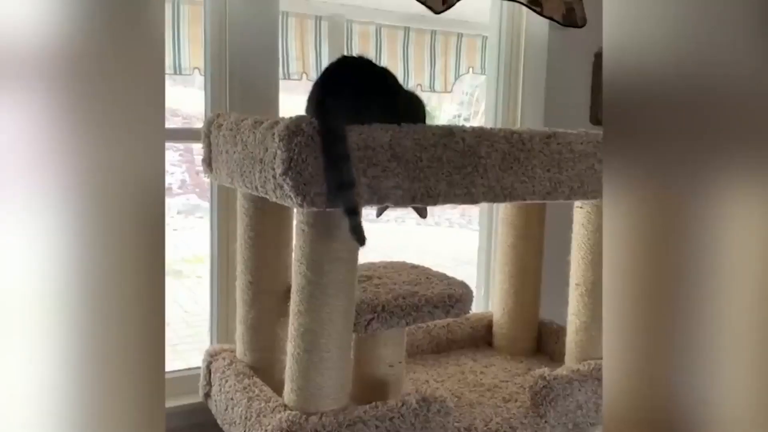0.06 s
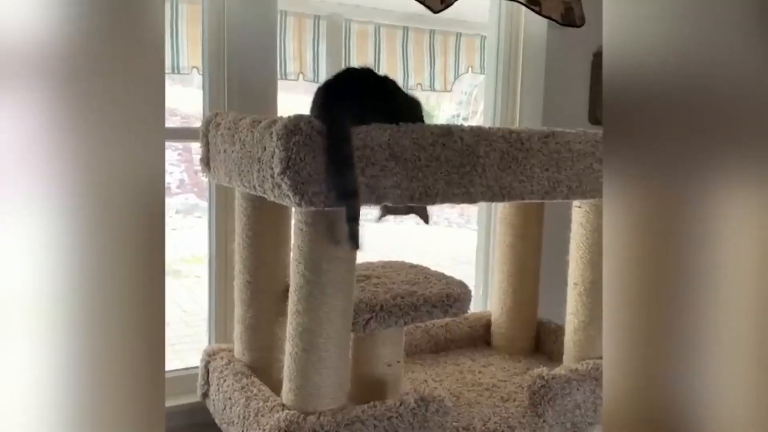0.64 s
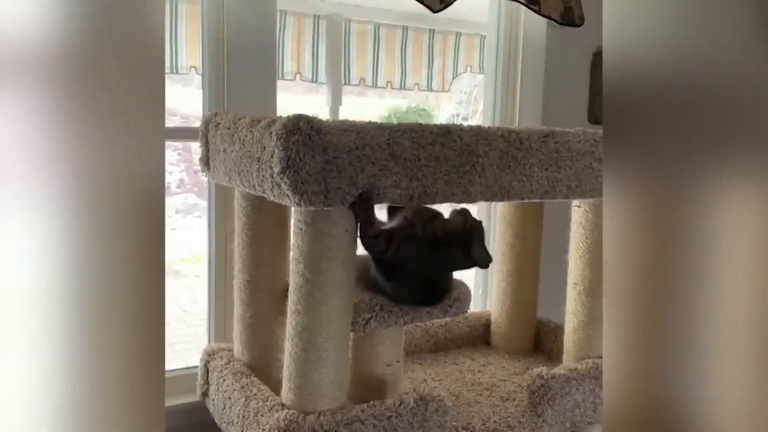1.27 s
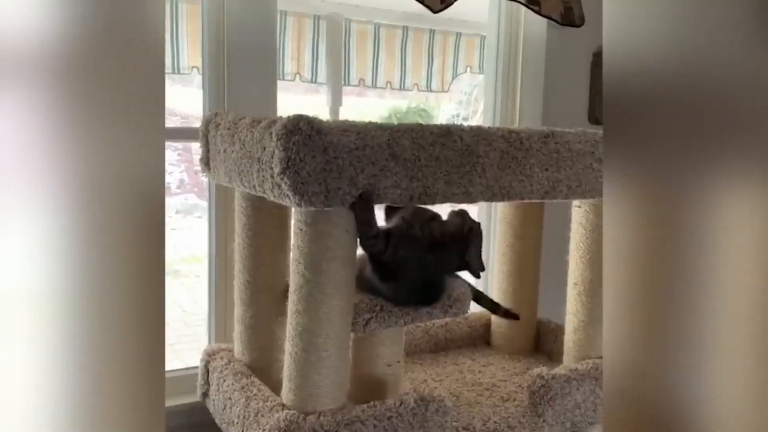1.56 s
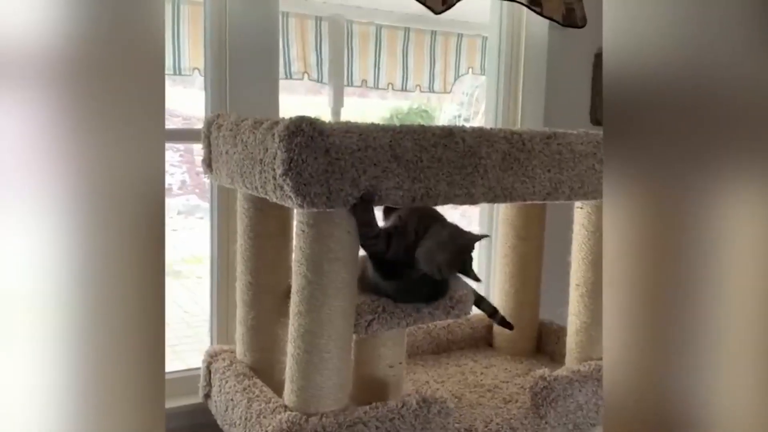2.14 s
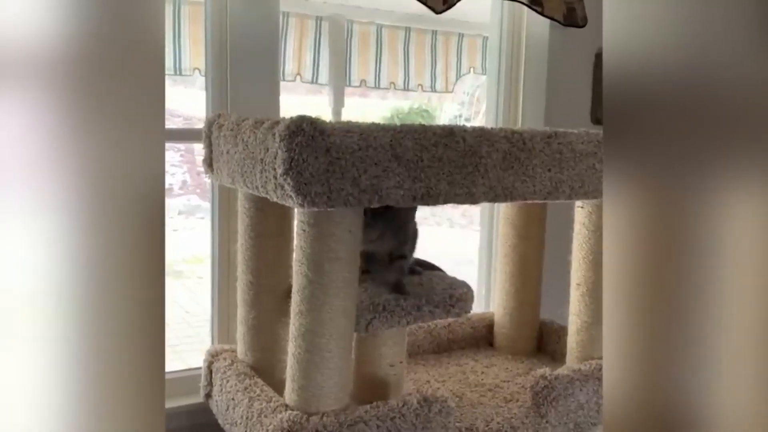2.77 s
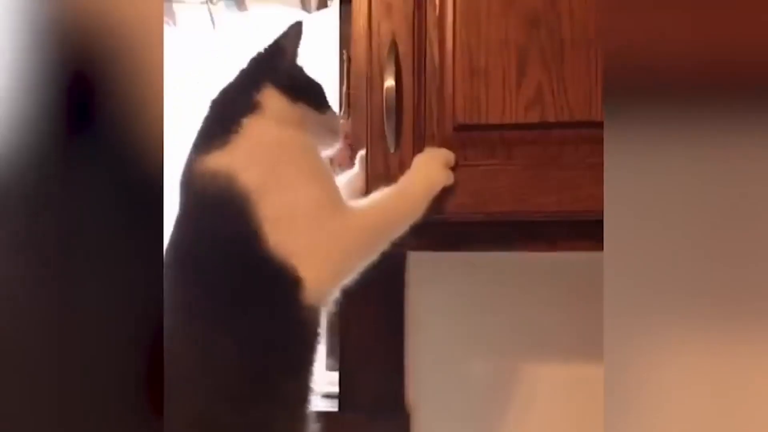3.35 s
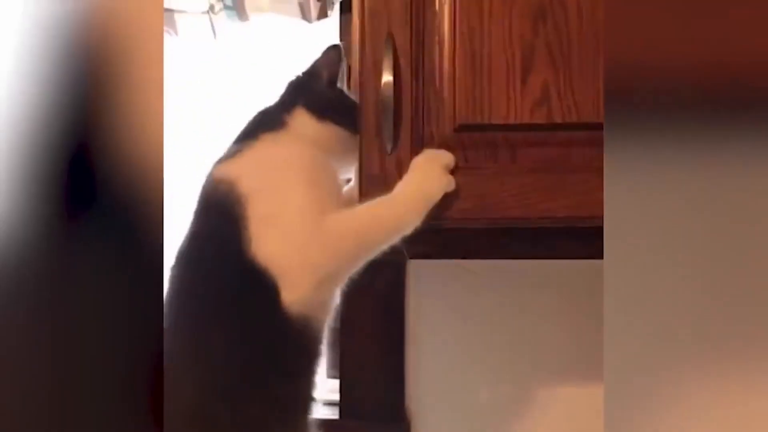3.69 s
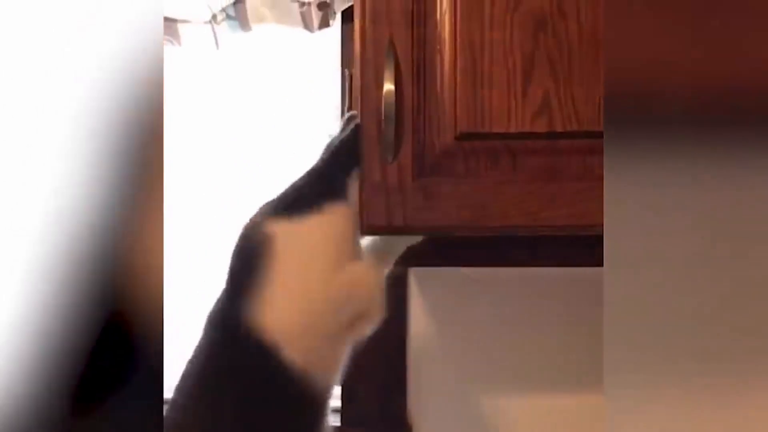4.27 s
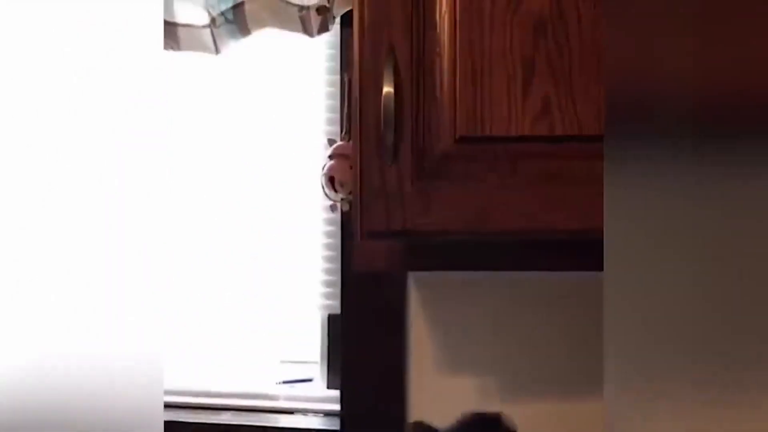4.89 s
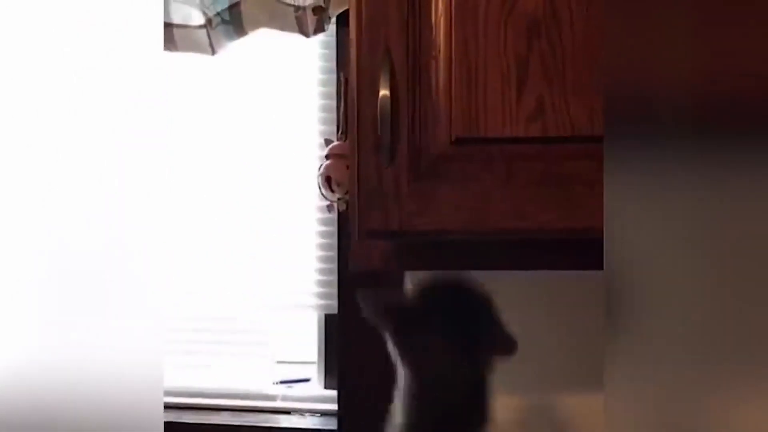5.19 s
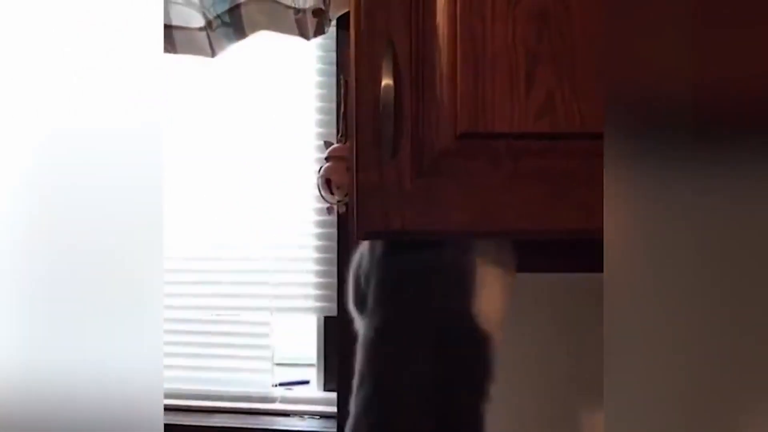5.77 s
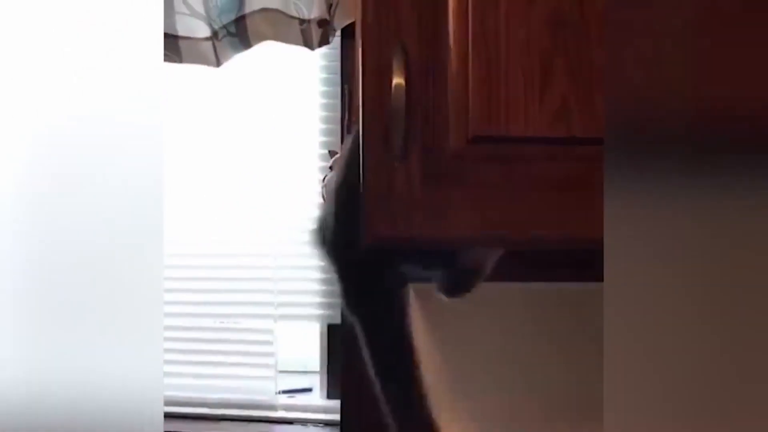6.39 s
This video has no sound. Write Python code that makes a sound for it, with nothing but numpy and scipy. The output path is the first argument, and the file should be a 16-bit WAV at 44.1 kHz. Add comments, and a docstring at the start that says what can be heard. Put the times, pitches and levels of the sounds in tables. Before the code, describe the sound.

A cat claws and thumps onto a carpeted cat tree, then paws a wooden cabinet door that bangs twice over a low hum.

```python
"""Claws snap out of the carpet of a cat tree in a quiet sunroom; then the cat thuds onto a shelf,
exciting the tower's modes and rocking it on its base. The scene changes to a kitchen with a mains hum,
where a cat scuffs and picks at a wooden cabinet door. Twice the door falls back on its frame,
and the impact sets its panel booming."""
import sys
import numpy as np
from scipy import signal
from scipy.fft import rfft, irfft, next_fast_len
from scipy.io import wavfile

SR = 44100
rng = np.random.default_rng(int(sys.argv[2]) if len(sys.argv) > 2 else 0)


def wav_out(sig):
    """Save sig, one row per channel (or a flat mono array), as 16-bit PCM at SR to the path in sys.argv[1]."""
    wavfile.write(sys.argv[1], SR, np.round(np.clip(np.atleast_2d(sig).T, -1, 1) * 32767).astype(np.int16))


N = 288414
TIME = np.arange(N) / SR
EVENT_TIME = TIME[:32768]  # seconds within one short sound

# Each row: start in seconds, ring level in dB, ring tilt in dB per octave, thud level in dB,
# thud cutoff in Hz.
LANDINGS = [(.822, -34, -1.5, -35, 280), (0.847, -39.5, -1.5, -36, 201), (1.043, -33, 2.5, -18, 450),
            (1.05, -12, .5, -17, 2780), (2.338, -41, -1, -35, 320), (2.468, -29, -4, -39, 420),
            (2.529, -55, -6, -60, 151)]
# Each row: mode frequency in Hz, level in dB, decay time (T60) in seconds.
TOWER_MODES = [(71.3, 2.5, .5), (82.4, -33, .3), (154.8, -3.5, 0.33), (233.5, -10, 0.26),
               (279.6, -17, 0.31), (391, -27, 0.42), (513, -29, 0.22), (573, -17.5, 0.21),
               (639, -7.5, 0.13), (664, -34, 0.26), (714, -29, 0.37), (764, -23.5, 0.22), (874, -15, 0.18),
               (922, -34.5, 0.36), (1030, -31, 0.24), (1133, -24, 0.25), (1480, -35, 0.17)]
# A body on carpeted wood. Each row: frequency in Hz, level in dB.
THUD_SPECTRUM = [(30, -13), (110, 0.5), (220, -0.5), (450, -7), (850, -7), (1150, -16.5), (1650, -20),
                 (2100, -34), (3300, -29.5), (4600, -44.5), (15000, -46)]
# Reverberation. Each row: frequency in Hz, T60 in seconds.
SUNROOM_T60 = [(100, 0.42), (400, 0.43), (1400, 0.36), (3000, 0.24), (7000, 0.21), (14000, 1)]
# Stereo spread of a contact. Each row: frequency in Hz, side minus mid in dB.
HIT_WIDTH = [(60, -31), (200, -17.5), (380, -10.5), (700, -1.5), (1300, -5.5), (4000, 2.5), (15000, -3.5)]
def landings():
    """Impact excitation: the cat's soft weight gives a dull thud and rings the tower's modes."""
    out = np.zeros((2, N))
    for s, ring_db, tilt_db, thud_db, cutoff_hz in LANDINGS:
        thud = burst(THUD_SPECTRUM, SUNROOM_T60, contact_s=.012, room_db=-6, rise_s=.0051,
                     width=HIT_WIDTH)
        tower = ring(TOWER_MODES, rise_s=.0047, tilt_db=tilt_db)
        add(out, s, amp(ring_db) * tower + amp(thud_db) * soften(thud, cutoff_hz))
    return out

# Each row: start in seconds, boom level in dB, boom tilt in dB per octave, clack level in dB,
# clack cutoff in Hz.
DOOR_KNOCKS = [(5.3797, -39, 3, -28.5, 2500), (5.385, -27, 1, -25, 5030), (5.3922, -16, 1, -21.5, 5560),
               (5.474, -52, 3.5, -37, 3480), (6.224, -26.5, -1.5, -36.5, 1490),
               (6.2314, -43.5, 6.5, -26.5, 4100), (6.2369, -16, -3, -26.5, 2510),
               (6.2433, -23, 2, -23.5, 4270), (6.283, -47, 6, -30.5, 4000), (6.317, -59, 1, -35, 3930)]
# Each row: mode frequency in Hz, level in dB, T60 in seconds.
DOOR_MODES = [(123.6, -24.5, 0.14), (142, -12.5, 0.8), (144.8, -1.5, 0.8), (182, -12, 0.5),
              (222.1, -13, 0.35), (292, -7.5, 0.37), (340.3, -8, 0.34), (468, -19.5, 0.34),
              (585, -31, 0.38), (769, -17, 0.14), (952, -28, 0.35), (1120, -24.5, 0.14),
              (1250, -31.5, 0.37), (1345, -35, 0.22), (1472, -31, 0.23), (1616, -29.5, 0.43),
              (1740, -33, 0.19), (1834, -30, 0.29), (1928, -33.5, 0.46), (2250, -42, 0.41),
              (2300, -37.5, 0.23), (2370, -36.5, 0.2), (2666, -27, 0.14), (2860, -39.5, 0.42),
              (2920, -32, 0.16), (2954, -35.5, 0.084), (3300, -37.5, 0.41), (5640, -53, .22)]
# Door against frame. Each row: frequency in Hz, level in dB.
CLACK_SPECTRUM = [(25, 0), (80, 2), (200, 17.5), (330, 6.5), (550, -4.5), (850, -1.5), (1500, -2),
                  (2000, -5), (2900, -1), (4000, -7), (5200, -17), (7000, -17.5), (9000, -18)]
# Reverberation. Each row: frequency in Hz, T60 in seconds.
KITCHEN_T60 = [(100, 0.25), (400, 0.6), (1500, 0.41), (3000, 0.37), (6000, 0.45), (9000, .28)]
def door_knocks():
    """Free vibration of a plate: the door chatters on its frame, and its panel booms after each blow."""
    out = np.zeros((2, N))
    for s, boom_db, tilt_db, clack_db, cutoff_hz in DOOR_KNOCKS:
        clack = burst(CLACK_SPECTRUM, KITCHEN_T60, contact_s=.0078, room_db=-9.5, rise_s=.0013)
        boom = ring(DOOR_MODES, rise_s=.00093, tilt_db=tilt_db)
        add(out, s, amp(boom_db) * boom + amp(clack_db) * soften(clack, cutoff_hz))
    return out

# Each row: start in seconds, then the levels of tick, snap, knock and shelf ring in dB.
CLAW_SNAPS = [(0.764, -61, -44, -39.5, -45), (.770, -50, -41.5, -37, -47), (0.805, -70, -52, -41.5, -41.5),
              (0.87, -66, -57, -52, -70), (0.891, -68, -57.5, -51, -72), (.968, -78, -65.5, -53, -54.5),
              (1.315, -82, -70, -64.5, -71.5), (1.652, -84, -75, -62, -72), (2.326, -62, -43, -39, -60),
              (2.456, -40, -39.5, -32, -48), (2.461, -58, -65, -53, -32), (2.61, -74, -61.5, -73, -76)]
# The carpet's snap and the board's knock. Each row: frequency in Hz, level in dB.
SNAP_SPECTRUM = [(500, -26.5), (2000, -8), (3500, 4), (4900, -15), (5700, 4.5), (6600, 8), (7600, -2.5),
                 (9000, -35), (10500, -11), (15500, -33)]
BOARD_SPECTRUM = [(40, -7), (180, -0.5), (350, -1), (520, -4), (680, -4), (1080, -10), (1400, -10),
                  (2000, -12), (3500, -19.5), (6000, -35), (15000, -55.5)]
# Each row: mode frequency in Hz, level in dB, T60 in seconds.
SHELF_MODES = [(354, -2, 0.23), (392, -8, 0.22), (643, -1.5, 0.14), (805, -11, 0.18), (900, -3, 0.099),
               (955, -8.5, 0.18), (1220, -1, 0.065), (1362, 4.5, 0.04), (1430, -18, 0.17),
               (1674, -20.5, 0.29), (2350, -16, 0.12)]
def claw_snaps(tick_s=.0015):
    """Sudden release of tension: a claw lets go of a fibre, and the board beneath knocks and rings."""
    out = np.zeros((2, N))
    shelf = ring(SHELF_MODES, rise_s=.001)
    for s, tick_db, snap_db, knock_db, ring_db in CLAW_SNAPS:
        snap = burst(SNAP_SPECTRUM, SUNROOM_T60, contact_s=.0029, room_db=-10, rise_s=.00019,
                     width=HIT_WIDTH)
        knock = burst(BOARD_SPECTRUM, SUNROOM_T60, contact_s=.01, room_db=-6.5, rise_s=.0053,
                      width=HIT_WIDTH)
        tick = np.diff(rng.standard_normal(len(EVENT_TIME) + 1)) * np.exp(-EVENT_TIME / tick_s)
        release = amp(tick_db) * tick + amp(snap_db) * snap
        add(out, s, release + amp(knock_db) * knock + amp(ring_db) * shelf)
    return out

# Each row: start in seconds, click level in dB, ring level in dB, ring tilt in dB per octave.
DOOR_PICKS = [(3.397, -50, -58, 5.5), (3.609, -32.5, -38, 4.5), (3.860, -63, -49, 5),
              (3.955, -41.5, -51, 4.5), (4.209, -49, -40.5, 2), (5.706, -50, -54.5, 5.5),
              (6.149, -40, -36.5, 0)]
# A claw on wood. Each row: frequency in Hz, level in dB.
CLICK_SPECTRUM = [(200, 9), (800, 0), (1600, 2), (3000, 3), (4500, -4.5), (6000, -7), (9000, -11.5)]
def door_picks():
    """A brief, hard contact is broadband: claws click on the door's edge and reach its upper modes."""
    out = np.zeros((2, N))
    for s, click_db, ring_db, tilt_db in DOOR_PICKS:
        click = burst(CLICK_SPECTRUM, KITCHEN_T60, contact_s=.0054, room_db=-9, rise_s=.00031)
        panel = ring(DOOR_MODES, rise_s=.0015, tilt_db=tilt_db)
        add(out, s, amp(ring_db) * panel + amp(click_db) * click)
    return out

# Each row: start in seconds, level in dB, pitch in Hz.
PAW_STEPS = [(4.911, -17.5, 77.4), (4.924, -15, 57.7), (4.97, -20, 66), (5.194, -19.5, 69)]
def paw_steps(t60_s=.048):
    """Strong damping: each padded step on the counter is a low tone that dies within a few cycles."""
    out = np.zeros((2, N))
    for s, db, hz in PAW_STEPS:
        add(out, s, ring([(hz, db, t60_s)], rise_s=.0021))
    return out

# Shifts of the cat's weight. Each row: start in seconds, level in dB, T60 in seconds.
SHOVES = [(.80, -35, 1.7), (1.06, -25, 1.37), (2.49, -31, 0.48), (2.74, -47, 3.1)]
# The tower's low sway. Each row: frequency in Hz, level in dB.
SWAY_SPECTRUM = [(12, -14.5), (27, -4.5), (36, -1), (55, -16), (75, -16.5), (130, -24.5), (400, -42),
                 (1500, -100)]
def rocking(rise_s=.04):
    """Incoherent addition: the sway builds and decays after each shove, and the shoves sum in power."""
    power = 0
    for s, db, t60 in SHOVES:
        age = np.maximum(TIME - s, 0)
        envelope = amp(db - 60 * age / t60) * (1 - np.exp(-age / rise_s))
        power = power + envelope ** 2
    return noise(SWAY_SPECTRUM, N) * np.sqrt(power)

# Each row: peak time, rise and fall in seconds, level in dB, tilt in dB per octave.
SCUFFS = [(3.30, 0.056, 0.19, -48.5, 7), (3.409, 0.049, .2, -52, -3.5), (3.581, 0.084, 0.35, -58, 4.5),
          (3.929, 0.073, 0.25, -45.5, -4.5), (4.21, .04, 0.041, -60, 1), (4.82, 0.16, 0.18, -55.5, -3),
          (5.71, 0.042, 0.079, -49, 0.5), (6.11, 0.12, 0.28, -51.5, 0.5), (6.179, 0.03, 0.093, -55.5, 4)]
# Fur and pads on wood. Each row: frequency in Hz, level in dB.
RUB_SPECTRUM = [(200, 7.5), (700, 5), (1500, 6.5), (3000, 1.5), (4300, -1.5), (5200, -10), (9000, -15.5)]
def scuffs(grain_db=.5, grain_samples=64, catch_db=1.76):
    """Stick-slip friction: many tiny slips of uneven size swell and fade under each stroke."""
    out = np.zeros((2, N))
    size = len(EVENT_TIME)
    from_peak = EVENT_TIME - EVENT_TIME[-1] / 2
    for s, rise, fall, db, tilt_db in SCUFFS:
        slips = rng.standard_normal(size)
        grain = np.repeat(rng.standard_normal(size), grain_samples)[:size]
        catch = unit(soften(rng.standard_normal(size), hz=45))  # the paw catches and lets go
        rub = colour(slips * amp(grain_db * grain + catch_db * catch), RUB_SPECTRUM, tilt_db)
        add(out, s + from_peak[0], amp(db) * stroke(from_peak, rise, fall) * rub)
    return out

# Each row: peak time in seconds, fur level in dB, board level in dB.
BRUSHES = [(0.746, -80, -60.5), (.88, -69.5, -60), (1.09, -70, -61), (2.29, -69.5, -71), (2.6, -78, -66.5)]
# Fur on carpet. Each row: frequency in Hz, level in dB.
FUR_SPECTRUM = [(600, -9.5), (2000, 3.5), (3500, -3), (6500, 3), (11000, -2), (15500, -2)]
# Stereo spread of fur and room air. Each row: frequency in Hz, side minus mid in dB.
AIR_WIDTH = [(60, -27.5), (200, -8.5), (380, -3.5), (700, 1.5), (15000, -0.5)]
def brushing():
    """Friction noise: fur hisses on the carpet as the body turns, and the board beneath murmurs."""
    fur, board = noise(FUR_SPECTRUM, N, AIR_WIDTH), noise(BOARD_SPECTRUM, N, HIT_WIDTH)
    return sum((amp(fur_db) * fur + amp(board_db) * board) * stroke(TIME - s, rise_s=.054, fall_s=.061)
               for s, fur_db, board_db in BRUSHES)

# Each row: frequency of a spectral line in Hz, relative level in dB.
HUM_LINES = [(49.9, -2), (99.8, -12.5), (120, -15), (143.5, -21), (236.5, -18), (287, -17)]
def mains_hum(level_db=-37.5, lowest_waver=.21, upper_waver=.8):
    """Amplitude and phase modulation: an appliance's hum wavers, most of all in its upper lines."""
    lines = []
    for k, (hz, db) in enumerate(HUM_LINES):
        wander = (upper_waver if k else lowest_waver) * (drift(3.8) + 1j * drift(5)) / 2
        carrier = np.exp(2j * np.pi * (hz * TIME + rng.random()))
        lines.append(amp(db) * unit(((1 + wander) * carrier).real))
    return amp(level_db) * (lines[0] * hum_swell() + sum(lines[1:]))

def hum_swell(start_s=4.32, length_s=.27, edge_s=.04, height_db=4):
    """A trapezoidal envelope: the level rises once, holds and falls back."""
    age = TIME - start_s
    return amp(height_db * np.clip(np.minimum(age, length_s - age) / edge_s, 0, 1))

# The kitchen's low rush and rumble. Each row: frequency in Hz, level in dB.
RUSH_SPECTRUM = [(76, -28.5), (130, -2.5), (192, -6), (235, -3), (289, 0), (400, -7.5), (509, -16),
                 (587, -7.5), (676, -17), (900, -18.5), (1150, -22), (2070, -31.5), (4050, -33.5),
                 (5000, -41.5), (9000, -49)]
RUMBLE_SPECTRUM = [(18, -18.5), (40, 7.5), (65, 4.5), (90, -10.5), (120, -6), (170, -3.5), (400, -50)]
# Each row: peak time in seconds, gain in dB.
RUSH_SWELLS = [(3.3, 2.5), (4.15, 2.5), (5.05, 3)]
def rush_and_rumble(rush_db=-45.5, rumble_db=-47):
    """Slow amplitude modulation: a low rushing noise swells gently three times over a steady rumble."""
    swell_db = sum(db * stroke(TIME - s, rise_s=.24, fall_s=.24) for s, db in RUSH_SWELLS)
    rush = amp(rush_db + swell_db) * noise(RUSH_SPECTRUM, N)
    return rush + amp(rumble_db) * noise(RUMBLE_SPECTRUM, N)

# Each row: centre frequency in Hz, bandwidth in Hz, gain in dB.
KITCHEN_RESONANCES = [(230.3, 6.3, 6), (723, 7.3, 6.5), (873, 26, 6.5), (1414, 37, 7.5), (1512, 42, 5.5),
                      (1767, 45, 5.5), (1978, 40, 4.5), (2150, 16, 8), (2270, 20, 3.5), (2680, 30, 0),
                      (3470, 44, -1), (5640, 83, 2), (6000, 460, 3), (7870, 88, 1)]
def kitchen_resonance(x):
    """Room resonance: the kitchen's hard surfaces colour the sound in narrow, ringing bands."""
    return x + sum((amp(db) - 1) * signal.lfilter(*signal.iirpeak(hz, hz / width, fs=SR), x)
                   for hz, width, db in KITCHEN_RESONANCES)

# Each row: frequency in Hz, level in dB.
AIR_SPECTRUM = [(12, -30), (30, -3.5), (50, -1), (74, -8.5), (213, -14), (290, -14), (491, -21),
                (800, -32.5), (1380, -37.5), (3800, -41.5), (5000, -54), (6400, -42), (11500, -48.5),
                (15500, -48.5)]
def sunroom_air(level_db=-55):
    """Stationary ambient noise: the sunroom's quiet air, strongest in the bass."""
    return amp(level_db) * noise(AIR_SPECTRUM, N, AIR_WIDTH)

def ring(modes, rise_s, tilt_db=0):
    """Modal superposition: damped sines add; a harder contact tilts them towards the upper modes."""
    lowest_hz = modes[0][0]
    waves = 0
    for hz, db, t60 in modes:
        decay = amp(db + tilt_db * np.log2(hz / lowest_hz) - 60 * EVENT_TIME / t60)
        waves = waves + decay * np.sin(2 * np.pi * hz * EVENT_TIME)
    return (1 - np.exp(-EVENT_TIME / rise_s)) * waves

def burst(spectrum, room_t60, contact_s, room_db, rise_s, width=None):
    """Dense modes merge into noise: a short direct crack, then reverberation dying band by band."""
    size = len(EVENT_TIME)
    hz, t, bands = signal.stft(noise(spectrum, size, width), SR, nperseg=256)
    decay = amp(-60 * t / at_hz(room_t60, hz)[:, None])
    tail = signal.istft(bands * decay, SR, nperseg=256)[1][:, :size]
    attack = 1 - np.exp(-EVENT_TIME / rise_s)
    return tail * (np.exp(-EVENT_TIME / contact_s) + amp(room_db)) * attack

def noise(spectrum, size, width=None):
    """Mid-side stereo: coloured noise; a width adds a side signal that makes the channels differ."""
    count = next_fast_len(size)
    mid = colour(rng.standard_normal(count), spectrum)
    if width is None:
        return np.array([mid, mid])[:, :size]
    side = rfft(colour(rng.standard_normal(count), spectrum))
    side = irfft(side * amp(at_hz(width, np.fft.rfftfreq(count, 1 / SR))), count)
    return np.array([mid + side, mid - side])[:, :size]

def colour(x, spectrum, tilt_db=0):
    """Spectral shaping, tilted in dB per octave about 3 kHz, at rms 1."""
    hz = np.fft.rfftfreq(len(x), 1 / SR)
    gain = amp(at_hz(spectrum, hz) + tilt_db * np.log2((hz + 1) / 3000))
    return unit(irfft(rfft(x) * gain, len(x)))

def stroke(t, rise_s, fall_s):
    """A Gaussian envelope that swells to 1 at t = 0 and fades again."""
    return np.exp(-(t / np.where(t < 0, rise_s, fall_s)) ** 2)

def drift(max_hz):
    """Slow sines of random phase sum to a chance fluctuation of rms 1."""
    rates = max_hz * rng.uniform(.1, 1, 20)
    return unit(sum(np.sin(2 * np.pi * (hz * TIME + rng.random())) / np.sqrt(hz) for hz in rates))

def soften(x, hz):
    """Low-pass filtering: a softer contact lasts longer and excites less treble."""
    return signal.lfilter(*signal.butter(2, min(hz, SR / 2 - 1), fs=SR), x)

def low_pass(x, hz):
    """A windowed sinc sets a steep band limit."""
    return signal.oaconvolve(x, signal.firwin(401, hz, window=("kaiser", 9), fs=SR)[None], "same")

def add(mix, s, sound):
    """Superposition: mixes a sound in at s seconds."""
    part = mix[:, round(s * SR):][:, :sound.shape[-1]]
    part += sound[..., :part.shape[1]]

def at_hz(points, hz):
    """Interpolation on a log-frequency axis."""
    f, value = np.transpose(points)
    return np.interp(np.log(hz + 1), np.log(f + 1), value)

def unit(x):
    """Normalisation to rms 1."""
    return x / np.sqrt(np.mean(x ** 2) + 1e-20)

def amp(db):
    """Decibels to amplitude ratio."""
    return 10 ** (np.asarray(db) / 20)

def scene(change_s=3.194, fade_s=.11):
    """An equal-power crossfade leads from the wide sunroom to the duller, mono kitchen."""
    sunroom = rocking() + brushing() + landings() + claw_snaps() + sunroom_air()
    kitchen = door_knocks() + door_picks() + paw_steps() + scuffs() + mains_hum() + rush_and_rumble()
    kitchen = low_pass(kitchen_resonance(kitchen), hz=9250)
    fade = np.clip((TIME - change_s) / fade_s, 0, 1)
    return sunroom * np.sqrt(1 - fade ** 2) + kitchen * fade

def record(dry):
    """Band limiting removes the highest treble."""
    return low_pass(dry, hz=15900)

dry = scene()
out = record(dry)
wav_out(out)
```